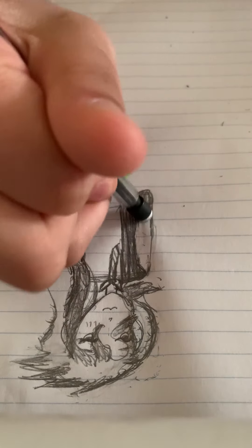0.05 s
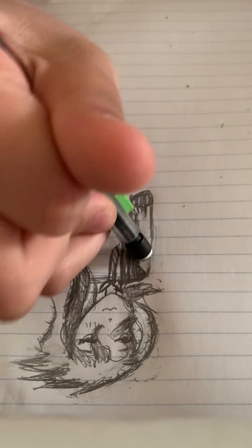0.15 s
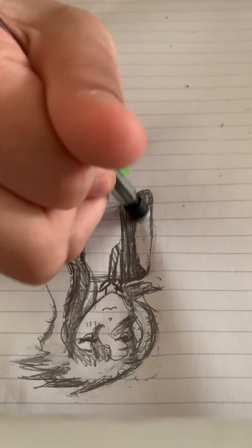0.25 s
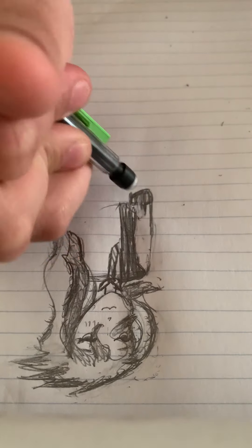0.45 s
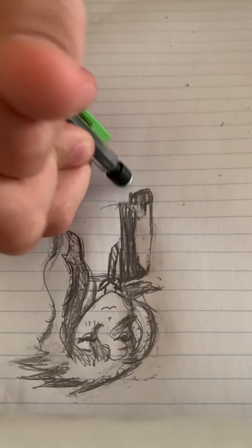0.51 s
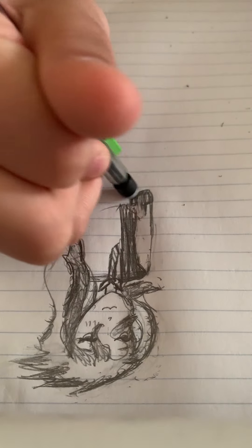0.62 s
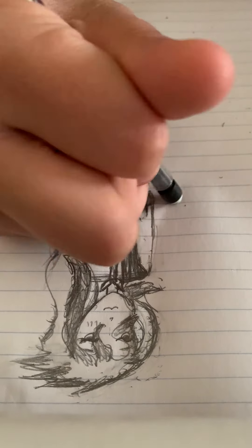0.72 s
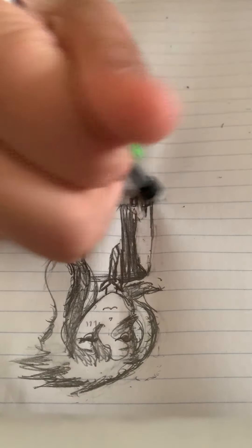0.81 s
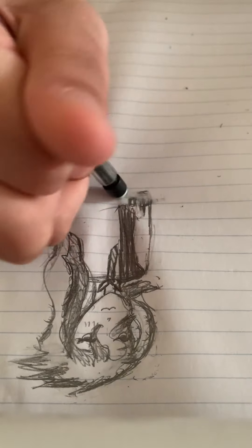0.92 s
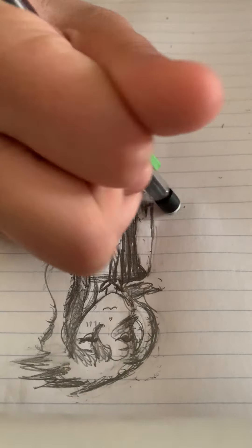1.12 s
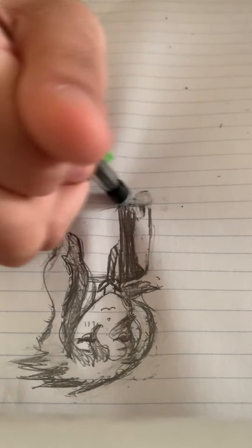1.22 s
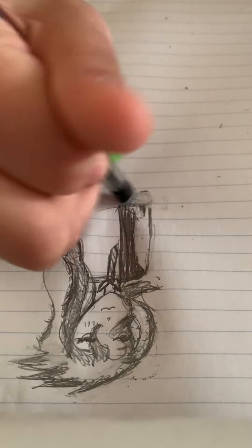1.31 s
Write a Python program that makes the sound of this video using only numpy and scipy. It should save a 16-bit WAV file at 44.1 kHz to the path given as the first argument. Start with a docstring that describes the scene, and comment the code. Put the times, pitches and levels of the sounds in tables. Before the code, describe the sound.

Close up in a quiet room, an eraser rubs a notepad with one sharp pencil click. After a brief lull with faint handling, four quick hissing strokes follow, with dull bumps and small crackles of paper.

```python
"""A small room: a pencil-end eraser scrubs a notepad in short strokes, close to a phone.
Rubber slips on the paper grain and hisses; the pad thumps and the sheet crackles as the hand turns.
The pencil's loose parts give one sharp tap and a few faint ticks. The desk sways and the grip
shifts, over room noise and a low hum."""
import sys
import numpy as np
from scipy import signal
from scipy.fft import rfft, irfft
from scipy.io import wavfile

SR = 44100
rng = np.random.default_rng(int(sys.argv[2]) if len(sys.argv) > 2 else 0)


def dump(signal):
    """Clip the signal to [-1, 1] and save it as 16-bit WAV at the path in sys.argv[1]."""
    limited = np.clip(np.atleast_2d(signal).T, -1, 1)
    pcm = np.round(limited * 32767).astype(np.int16)
    wavfile.write(sys.argv[1], SR, pcm)


N = 59535
T = np.arange(N) / SR

# eraser strokes (start [s], fastest [s], end [s], hiss [dB], rustle [dB], rumble [dB], sharpness [-])
ERASER_STROKES = [(-.02, 0.067, 0.1, -64.5, -68, -69, 0.67), (0.129, 0.207, .25, -58, -58.5, -59, 2.1),
                  (0.187, 0.273, 0.49, -64, -68, -68, 4), (0.704, 0.776, 0.84, -54, -64, -46.5, 2.9),
                  (0.809, 0.947, 1.0076, -59, -65.5, -56, 1.9),
                  (1.016, 1.115, 1.211, -57.5, -62.5, -57, 2.93),
                  (1.178, 1.288, 1.361, -59, -63.5, -59.5, 1.76)]
# soft blows on the pad (time [s], relative level [dB], contact corner [Hz])
PAD_THUMPS = [(0.016, -45, 260), (.155, -46, 300), (0.2065, -27.5, 1085), (.412, -36, 240),
              (0.612, -37.5, 270), (.648, -40, 174), (0.7, -39, 420), (.748, -33.5, 700),
              (.756, -39.5, 840), (.787, -33, 570), (.829, -42.5, 280), (1.033, -37.5, 220),
              (1.047, -39.5, 610), (1.116, -52, 400), (1.145, -50.5, 714), (1.189, -38, 197),
              (1.224, -41, 330)]
# sheet buckles; loose parts click (time [s], relative level [dB], low-pass [Hz])
SHEET_CRACKLES = [(.158, -40, 6000), (0.188, -35.5, 2500), (0.2069, -20, 9000), (0.4534, -41.5, 6120),
                  (0.4618, -45, 5780), (0.7757, -31, 9200), (0.7889, -30, 8950), (0.8279, -38.5, 2210),
                  (.934, -35.5, 1770), (.9535, -33.5, 1940), (1.047, -32, 2000), (1.059, -40, 2400),
                  (1.147, -38, 1800), (1.1911, -42, 2000), (1.3264, -29.5, 7000)]
PENCIL_CLICKS = [(.2077, 1, 18800), (0.2093, -7.5, 14600), (0.4106, -35, 9200), (0.455, -36, 12720),
                 (.7765, -40, 8000), (1.002, -39, 10120)]
# barrel knocks in the fingers (time [s], relative level [dB])
BARREL_KNOCKS = [(0.6108, -44.5), (1.002, -57)]
# desk sways (start [s], level [dB], frequency [Hz], time scale [s])
DESK_SWAYS = [(0.226, -49, 202, 0.041), (.245, -48.5, 119.3, 0.042), (0.281, -48.5, 109, 0.045),
              (0.42, -52.5, 60, 0.037), (0.634, -51.5, 66.6, 0.071), (0.784, -49, 54, 0.067),
              (.893, -43, 70.3, 0.059), (0.899, -46.5, 118.5, 0.032), (1.304, -52, 56.3, 0.04)]
# grip shifts (start [s], fastest [s], end [s], skin rub [dB], rumble [dB])
GRIP_SHIFTS = [(0.413, 0.447, 0.557, -90.5, -62.5), (0.597, 0.643, 0.766, -71, -61.5)]
# body modes (frequency [Hz], relative level [dB], T60 [s])
PAD_MODES = [(205, -9, .09), (249, -3.5, 0.042), (294, -5, 0.055), (369.7, -8, 0.091), (535, -1.5, 0.042),
             (599, -4, 0.06), (965, -4, 0.021), (1167, -19.5, .04), (1342, -16.5, 0.025)]
PENCIL_MODES = [(2107, -7.5, 0.019), (5727, -1, 0.014), (6650, -1, 0.0093), (6894, -2.5, 0.016),
                (11600, -11, 0.0091), (11330, -11.5, 0.011), (13800, -11, 0.014)]
BARREL_MODES = [(1727, 0, 0.044), (2033, 3, 0.032), (2400, -13, 0.049), (2646, -4.5, 0.037)]
# source spectra (frequency [Hz], relative density [dB])
HISS_SPECTRUM = [(1500, -38.5), (2800, -10.5), (4100, 1), (5000, -4.5), (6100, 1.5), (7200, 2.5),
                 (8300, -5), (9900, 3), (12000, -6.5), (13100, 0.5), (14200, -5.5), (15400, -18.5),
                 (16200, -46.5)]
RUSTLE_SPECTRUM = [(200, -17.5), (550, 3), (800, -6.5), (1250, 3.5), (1620, -5.5), (1980, 3), (2500, -14),
                   (4000, -13.5), (9000, -44.5), (16000, -60.5)]
RUMBLE_SPECTRUM = [(30, -17), (90, 10), (150, -0.5), (230, 8.5), (380, -1), (460, -15), (600, -1.5),
                   (760, -20), (1500, -35.5), (5000, -48.5)]
CRACKLE_SPECTRUM = [(150, -25), (600, -7.5), (1000, 0), (1400, 1.5), (2100, -10), (2700, -10), (4100, -2),
                    (7000, -10.5), (15000, -25)]
CLICK_SPECTRUM = [(100, -43), (600, -29.5), (1450, -24), (1950, -3), (2600, -17), (3300, -9.5), (4200, -7),
                  (5400, -5), (6400, 1), (7200, -3.5), (8300, -4.5), (10000, -3.5), (11300, -0.5),
                  (12500, 5), (14500, -5), (17000, -14.5)]
SKIN_SPECTRUM = [(300, -15), (750, -22), (1200, 5.5), (1550, 2), (1950, 7.5), (2500, -20), (3200, -22),
                 (6500, -21), (12000, -28), (16000, -58)]
ROOM_SPECTRUM = [(20, -21.5), (45, -0.5), (70, 1), (130, -8.5), (260, -14.5), (500, -27), (800, -37.5),
                 (1300, -34), (1900, -31), (3000, -36.5), (7000, -36.5), (13000, -39.5), (14500, -45.5),
                 (15500, -59.5), (17000, -75.5)]
# phase between microphones (frequency [Hz], left lead [rad])
MIC_PHASE = [(20, 0), (250, -.3), (700, -1.1), (900, -.2), (1600, 0), (2400, .6), (2700, 2.6), (3800, 1.7),
             (5000, 2.9), (6400, 6.28), (7500, 6.28), (9800, 9.42), (11800, 12.57), (12600, 12.57),
             (14700, 15.7), (15800, 18)]
# balance between microphones (frequency [Hz], left minus right [dB])
MIC_BALANCE = [(60, -0.2), (300, -1), (700, -3), (1300, -4), (2400, -8), (4000, 1), (5000, -6.5),
               (6200, 1.5), (14000, -0.5)]

ROOM_DB, HUM_HZ, HUM_DB = -65, 60, -65.5
SLIPS_PER_S, SLIP_SPREAD_DB, FLUTTER_DB = 12000, 4, 0.84
SNAGS_PER_S, SNAG_SPREAD_DB = 1800, 3
SHUDDER_DB, SHUDDER_T60_S = -23, 0.14
BEND_DELAY_S = .0023  # at 1 kHz
ECHO_DB, ECHO_T60_S, ECHO_GAP_S, ECHO_TOP_HZ = -19, .13, 0.0035, 10960
SIDE_GAIN_DB, SIDE_BAND_HZ = 9.5, (130, 2000)


def undb(db):
    """dB to amplitude."""
    return 10 ** (np.asarray(db) / 20)


def unit(x):
    """Scale to RMS 1."""
    return x / np.sqrt(np.mean(x ** 2))


def band(x, hz, kind, order=2):
    """Butterworth filter."""
    return signal.sosfilt(signal.butter(order, np.minimum(hz, SR / 2 - 1), kind, fs=SR, output="sos"), x)


def curve(points):
    """(Hz, value) points joined on a log axis, per bin of a 2N transform."""
    hz, value = np.array(points, float).T
    bin_hz = np.arange(N + 1) * SR / (2 * N)
    return np.interp(np.log(bin_hz + 1), np.log(np.sort(hz)), value)


def colour(x, spectrum):
    """Minimum-phase filter, unit power gain."""
    cepstrum = irfft(np.log(unit(undb(curve(spectrum)))))
    cepstrum[1:N] *= 2
    cepstrum[N + 1:] = 0
    return irfft(rfft(x, 2 * N) * np.exp(rfft(cepstrum)))[:N]


def noise():
    """White noise, RMS 1."""
    return rng.standard_normal(N)


def wander(rate_hz):
    """Slow random drift, RMS 1."""
    return unit(np.interp(T * rate_hz, np.arange(N), noise()))


def decay(start_s, t60_s):
    """Exponential decay from start_s."""
    return (T >= start_s) * np.exp(-np.log(1000) * np.maximum(T - start_s, 0) / t60_s)


def ring(start_s, modes):
    """Damped modes, struck together."""
    return sum(undb(db) * decay(start_s, t60_s) * np.sin(2 * np.pi * hz * (T - start_s))
               for hz, db, t60_s in modes)


def swell(start_s, peak_s, end_s, sharpness):
    """Movement envelope: a sine arch of speed, raised to a power."""
    return np.abs(np.sin(np.pi * np.interp(T, [start_s, peak_s, end_s], [0, .5, 1]))) ** sharpness


def snap(start_s, tail_db, t60_s):
    """Impulse with a short noise tail."""
    return (np.arange(N) == int(start_s * SR)) + undb(tail_db) * decay(start_s, t60_s) * noise()


def friction(spectrum, slips_per_s=SLIPS_PER_S, spread_db=SLIP_SPREAD_DB):
    """Tiny uneven slips, fluttering with pressure, through a body's spectrum."""
    slips = (rng.random(N) < slips_per_s / SR) * np.sign(noise())
    sizes = undb(spread_db * np.minimum(rng.exponential(size=N), np.pi))
    flutter = undb(FLUTTER_DB * wander(170))
    return colour(unit(slips * sizes) * flutter, spectrum)


def room_tone():
    """Steady noise and a wavering low hum."""
    air = undb(ROOM_DB) * colour(noise(), ROOM_SPECTRUM)
    hum = undb(HUM_DB + 1.7 * wander(13)) * np.sqrt(2) * np.sin(2 * np.pi * HUM_HZ * T)
    return air + hum


def eraser():
    """Fine slips hiss on the grain, coarser snags rustle the sheet, the pad rumbles."""
    hiss = friction(HISS_SPECTRUM)
    rustle = friction(RUSTLE_SPECTRUM, SNAGS_PER_S, SNAG_SPREAD_DB)
    rumble = friction(RUMBLE_SPECTRUM)
    strokes = np.zeros(N)
    for start_s, peak_s, end_s, hiss_db, rustle_db, rumble_db, sharpness in ERASER_STROKES:
        rub = undb(hiss_db) * hiss + undb(rustle_db) * rustle + undb(rumble_db) * rumble
        strokes += swell(start_s, peak_s, end_s, sharpness) * rub
    return strokes


def pad_thumps():
    """Blows ring the pad, duller for softer contact, and leave a short shudder."""
    blows = sum(undb(db) * band(ring(start_s, PAD_MODES), corner_hz, "low")
                for start_s, db, corner_hz in PAD_THUMPS) / 2
    shudder = sum(undb(db + SHUDDER_DB) * decay(start_s, SHUDDER_T60_S) for start_s, db, _ in PAD_THUMPS)
    return band(blows + shudder * colour(noise(), RUMBLE_SPECTRUM), 174, "high", order=3)


def sheet_crackles():
    """Paper buckles in dry snaps, some bright, some dull."""
    snaps = sum(undb(db) * band(snap(start_s, tail_db=-20.5, t60_s=0.028), top_hz, "low", order=3)
                for start_s, db, top_hz in SHEET_CRACKLES)
    return colour(snaps, CRACKLE_SPECTRUM)


def pencil_clicks():
    """Loose parts snap, chatter and ring briefly."""
    clicks = np.zeros(N)
    for start_s, db, top_hz in PENCIL_CLICKS:
        chatter = colour(snap(start_s, tail_db=-25.5, t60_s=0.023), CLICK_SPECTRUM)
        ringing = undb(-22.5) * ring(start_s, PENCIL_MODES)
        clicks += undb(db) * band(chatter + ringing, top_hz, "low")
    return clicks


def desk_sways():
    """A few slow cycles of the desk top after a blow or a lean of the hand."""
    sways = np.zeros(N)
    for start_s, db, hz, scale_s in DESK_SWAYS:
        envelope = swell(start_s, start_s + scale_s / 4, start_s + scale_s * 1.4, sharpness=1.5)
        sways -= undb(db) * envelope * np.sin(2 * np.pi * hz * (T - start_s))
    return sways


def grip_shifts():
    """Skin slides on the barrel; the hand drags on the pad."""
    skin, drag = friction(SKIN_SPECTRUM), friction(RUMBLE_SPECTRUM)
    return sum(swell(start_s, peak_s, end_s, sharpness=1.2) * (undb(skin_db) * skin + undb(drag_db) * drag)
               for start_s, peak_s, end_s, skin_db, drag_db in GRIP_SHIFTS)


def barrel_knocks():
    """The barrel knocks dully in the fingers."""
    knocks = sum(undb(db) * ring(start_s, BARREL_MODES) for start_s, db in BARREL_KNOCKS) / 2
    return band(band(knocks, 1300, "high"), 3080, "low", order=8)


def bending_waves(x):
    """Dispersion: treble arrives first, bass milliseconds later."""
    khz = np.arange(N + 1) * SR / (2 * N) / 1000
    lag_rad = 4 * np.pi * 1000 * BEND_DELAY_S * np.sqrt(khz)
    return irfft(rfft(x, 2 * N) * np.exp(-1j * lag_rad))[:N]


def echo(x):
    """Short diffuse reflection from desk and walls."""
    tail = noise() * decay(ECHO_GAP_S, ECHO_T60_S)
    return undb(ECHO_DB) * signal.fftconvolve(band(x, ECHO_TOP_HZ, "low"), tail / np.linalg.norm(tail))[:N]


def microphones(x):
    """Two ports, each with its own phase and level per frequency."""
    left_gain = undb(curve(MIC_BALANCE) / 2)
    spectrum = rfft(x, 2 * N)
    left = irfft(spectrum * left_gain)[:N]
    right = irfft(spectrum / left_gain * np.exp(-1j * curve(MIC_PHASE)))[:N]
    return np.array([left, right])


def scene():
    """Close sources, echo and room tone; an antiphase side signal adds width."""
    movement = eraser() + grip_shifts() + desk_sways()
    impacts = pad_thumps() + sheet_crackles() + pencil_clicks() + barrel_knocks()
    near = movement + bending_waves(impacts)
    mid_echo, side_echo = echo(near), echo(near)
    mid = near + mid_echo + room_tone()
    side = undb(SIDE_GAIN_DB) * band(side_echo, SIDE_BAND_HZ, "band", order=1)
    side += undb(ROOM_DB - 8) * colour(noise(), ROOM_SPECTRUM)
    return microphones(mid) + np.array([side, -side])


def record(dry):
    """Phone passband: 23 Hz to 16.8 kHz."""
    top_cut = signal.ellip(8, .2, 80, 16800, fs=SR, output="sos")
    return signal.sosfilt(top_cut, band(dry, 23, "high", order=4))


dry = scene()
out = record(dry)
dump(out)
```